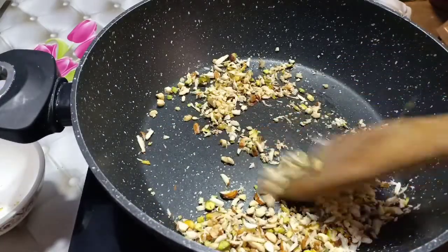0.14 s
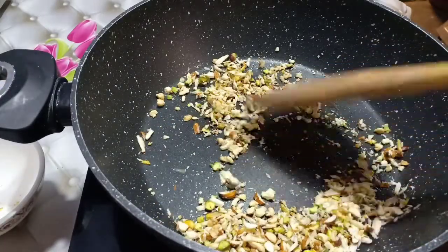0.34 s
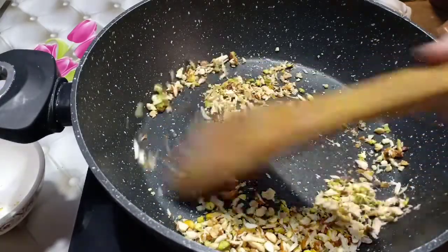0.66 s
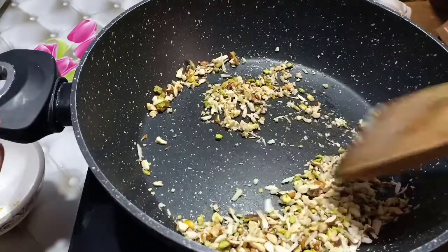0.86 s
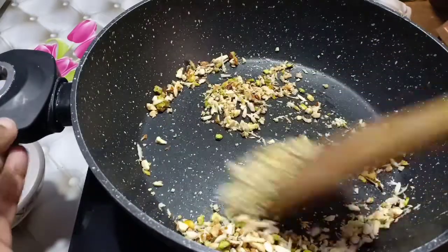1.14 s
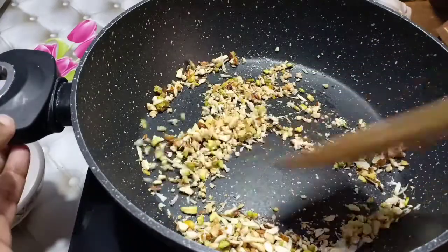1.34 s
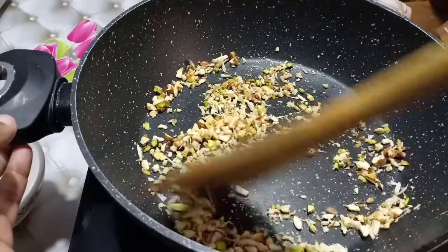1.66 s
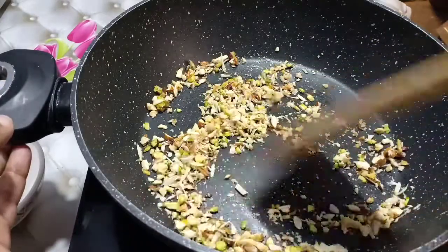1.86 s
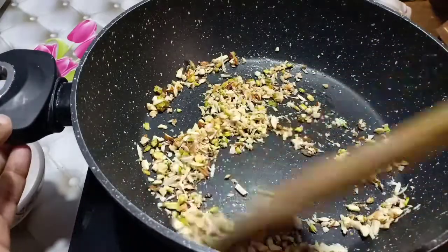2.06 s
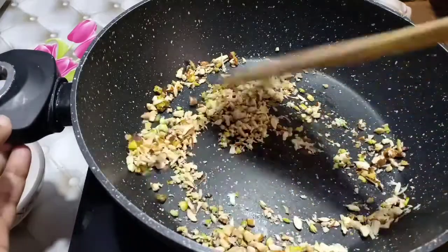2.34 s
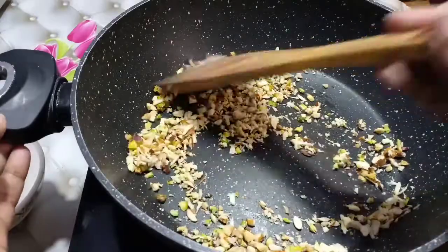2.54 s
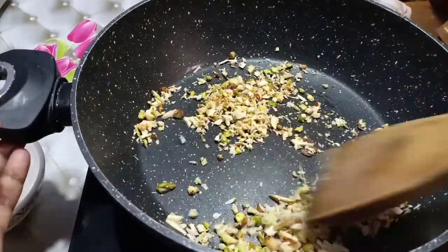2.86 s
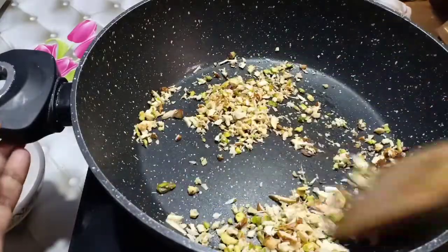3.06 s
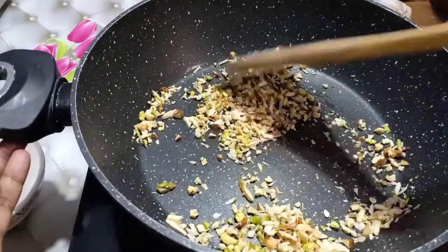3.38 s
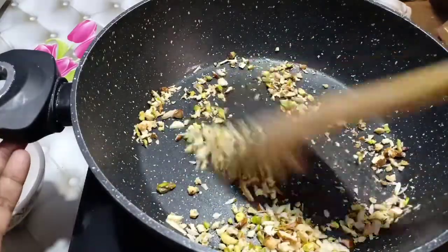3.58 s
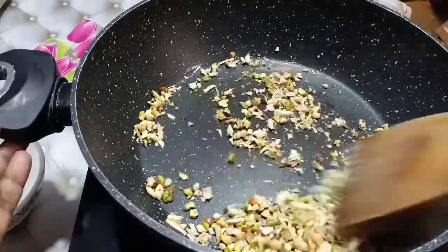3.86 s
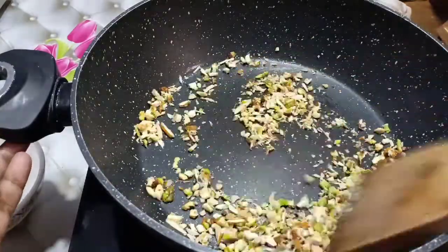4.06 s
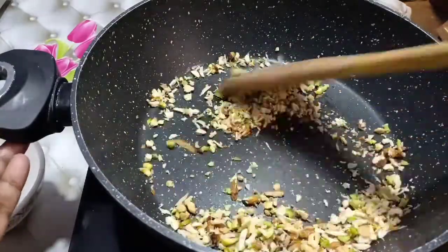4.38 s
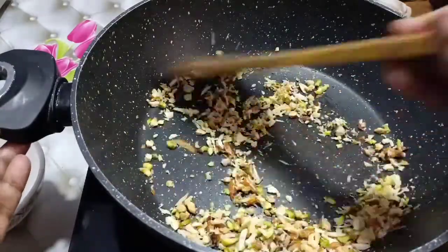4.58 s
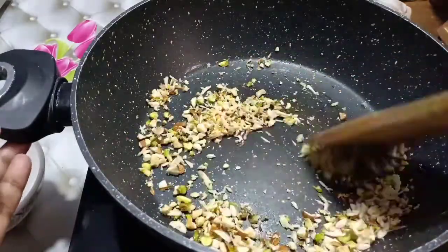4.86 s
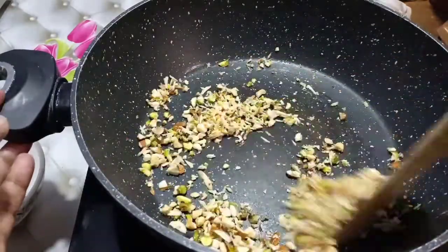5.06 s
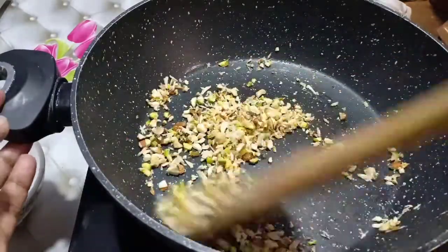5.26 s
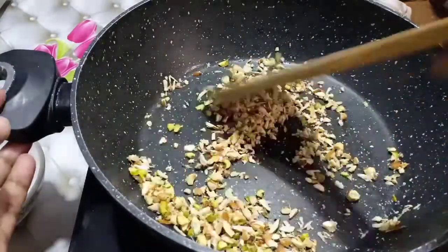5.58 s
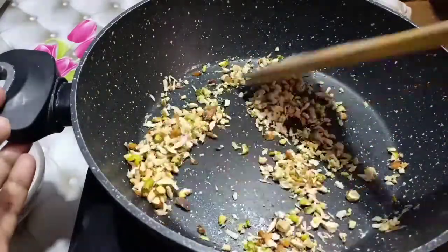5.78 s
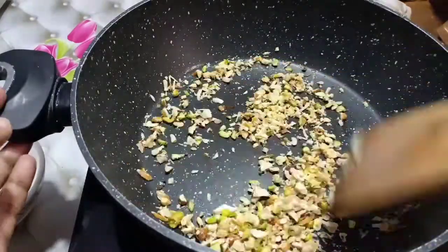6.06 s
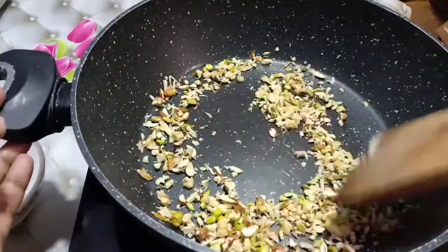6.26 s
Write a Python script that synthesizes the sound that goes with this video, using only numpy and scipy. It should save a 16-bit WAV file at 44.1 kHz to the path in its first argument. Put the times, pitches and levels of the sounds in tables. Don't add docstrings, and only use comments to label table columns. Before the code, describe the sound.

Heard from very near in stereo: uneven wood-on-pan scraping with dry nut hiss, sparse sharp knocks and dull thuds above a low airy drone, with one momentary dropout. After about four seconds the background switches suddenly to a brighter fan rush and faint high whine, while the blade edge taps rapidly, nut bits snap and drop, and grains swish around.

```python
import sys
import numpy as np
from scipy import signal
from scipy.fft import rfft, irfft
from scipy.io import wavfile
from scipy.ndimage import uniform_filter1d

SR = 44100
rng = np.random.default_rng(int(sys.argv[2]) if len(sys.argv) > 2 else 0)


def amplitude_ratio(level_db):
    exponent = np.asarray(level_db, float) / 20
    return 10 ** exponent


def put_to_file(sound):
    columns = np.atleast_2d(sound).T
    safe = np.clip(columns, -1, 1)
    whole_steps = np.round(safe * 32767)
    wavfile.write(sys.argv[1], SR, whole_steps.astype(np.int16))


N = 283563

T = np.arange(N) / SR
HZ = np.arange(N // 2 + 1) * SR / N + 1
BLOW_T = np.arange(SR // 4) / SR
SIDES = np.array([[1], [-1]])
STEADY_TOP_HZ = 15750

# freq_hz, level_db_per_hz
TICK_TONE = [(1000, -28.5), (1700, 9.5), (2400, 3.5), (3600, 3), (5000, -1.5), (5800, 5), (7000, -13.5),
             (9500, -11), (13000, -18.5), (16500, -25.5)]
# freq_hz, level_db_per_hz
SNAP_TONE = [(4000, -14), (5300, -30), (6150, 1.5), (7000, 8), (8200, -4), (9560, 9.5), (11000, -19),
             (13200, -12), (16300, -26)]
# freq_hz, level_db, t60_s
FLOOR_THUD = [(405, -0.5, 0.15), (476, 4.5, 0.086), (657, -0.5, 0.11), (973, 5, 0.03)]


def unit(x):
    return x / np.sqrt(np.mean(x ** 2))


def shape(points, peaks=(), at=HZ):
    hz, db = np.transpose(points)
    bells_db = sum(g / (1 + (2 * (at - f) / w) ** 2) for f, w, g in peaks)
    return amplitude_ratio(np.interp(np.log(at), np.log(hz), db) + bells_db)


def walk(rate_hz):
    hold = int(SR / rate_hz)
    steps = np.repeat(rng.standard_normal(N // 100 + 1), hold)[:N]
    return 1.5 * uniform_filter1d(uniform_filter1d(steps, hold), hold)


def grit(gain, per_s, spread_db, grain_s, smooth):
    caught = rng.random(N) < per_s / SR
    size = amplitude_ratio(spread_db * np.minimum(rng.exponential(size=N), 3)) * caught
    grains = signal.lfilter([1], [1, -np.exp(-1 / (grain_s * SR))], size)
    push = (unit(grains) + smooth) * rng.standard_normal((2, N))
    return unit(irfft(gain * (HZ < STEADY_TOP_HZ) * rfft(push), N))


def ring(modes, scatter_db, wide, rise_s, detune=0.012, sag=0):
    hz, db, t60 = np.transpose(modes)[:, :, None, None]
    chance = rng.standard_normal((len(modes), 4))[:, :, None]
    sag_s = 0.0045
    bent = BLOW_T + sag * sag_s * (np.exp(-BLOW_T / sag_s) - 1)
    phase = 2 * np.pi * hz * (1 + detune * chance[:, :1]) * bent
    phase = phase + chance[:, 1:2] / 4 + wide * chance[:, 2:3] * SIDES
    decay = np.exp(-np.log(1000) * BLOW_T / t60)
    y = np.sum(amplitude_ratio(db + scatter_db * chance[:, 3:]) * np.sin(phase) * decay, axis=0)
    y = y * np.sin(np.minimum(BLOW_T / rise_s, 1) * np.pi / 2) ** 2
    return y / np.max(np.abs(y))


def crack(tone, t60, wide):
    mid, side = rfft(rng.standard_normal((2, len(BLOW_T))))
    gain = shape(tone, at=np.arange(len(mid)) * 4 + 1)
    burst = irfft(gain * (mid + wide * SIDES * side), len(BLOW_T))
    fast = np.exp(-np.log(1000) * BLOW_T / t60)
    y = burst * (fast + 0.04 * fast ** 0.79) * np.minimum(BLOW_T / 0.00048, 1)
    return y / np.max(np.abs(y))


def add(out, start_s, y):
    i = int(start_s * SR)
    out[:, i:i + y.shape[1]] += y[:, :N - i]


def pressure(column, idle_db, lift_db_per_s):
    # start_s (full pressure), hold_s, ring_db, hiss_db
    strokes = [(.03, 0.082, -57, -67), (.186, 0.0072, -81, -82), (.500, 0.0059, -49.5, -59),
               (.56, 0.085, -56.5, -64), (.88, 0.041, -72, -84), (.980, 0.0073, -51, -57),
               (1.12, 0.053, -70, -89), (1.285, 0.055, -57.5, -64), (1.381, .01, -66, -57),
               (1.44, 0.13, -52, -62), (1.937, 0.1, -50, -54.5), (2.536, 0.07, -53.5, -63),
               (2.634, 0.068, -48.5, -53), (2.935, 0.0067, -64, -68), (3.073, 0.0062, -47.5, -57),
               (3.283, 0.051, -47, -53), (3.45, 0.087, -60.5, -75), (3.76, 0.014, -57, -72),
               (3.81, 0.0093, -59.5, -70), (4.14, 0.027, -59.5, -66), (4.235, .02, -48, -63)]
    press_db_per_s = 265
    total = amplitude_ratio(idle_db)
    for row in strokes:
        before_s = np.maximum(row[0] - T, 0)
        after_s = np.maximum(T - row[0] - row[1], 0)
        total = total + amplitude_ratio(row[column] - press_db_per_s * before_s - lift_db_per_s * after_s)
    return total


def scrape():
    # freq_hz, width_hz, level_db
    scrape_modes = [(1910, 280, 7), (2440, 140, 18), (3300, 260, 2.5), (3570, 690, 7.5), (4100, 240, -8),
                    (4990, 340, 9.5), (5720, 220, 10), (6200, 540, -13), (5300, 940, -7.5), (4600, 830, -3)]
    # freq_hz, level_db_per_hz
    hiss_tone = [(3000, -37.5), (6000, -8.5), (7500, -7.5), (9600, -4.5), (12000, -10), (13700, -4),
                 (15600, -11)]
    coating_top_hz, stir_db = 6440, 1.8
    push = rfft(grit(1, 700.0, 3.3, 0.002, 1.1))
    push = push / np.sqrt(1 + (HZ / coating_top_hz) ** 10)
    press = pressure(column=2, idle_db=-61, lift_db_per_s=142)
    bright = (press / amplitude_ratio(-53)) ** 0.67
    rings = 0
    for hz, width_hz, db in scrape_modes:
        stir = amplitude_ratio(db + stir_db * walk(20.67))
        mode = irfft(push / (1 + 2j * (HZ - hz) / width_hz), N)
        rings = rings + (bright if hz > 4000 else 1) * stir * mode
    hiss_press = pressure(column=3, idle_db=-84.5, lift_db_per_s=132.5)
    hiss = hiss_press * grit(shape(hiss_tone), 600.0, 2.5, 0.00077, 1.3)
    return amplitude_ratio(2.0) * press * unit(rings) + amplitude_ratio(-5.0) * hiss


def knocks():
    # start_s, body_db, rim_db, wall_db, rim_pitch_hz
    hard_knocks = [
        (1.3734, -13.5, -15.5, -8.5, 724),
        (2.9212, -10, -15, -11, 1040),
        (3.7401, -28, -31, -23, 900),
        (3.7454, -17, -22, -25.5, 1010),
    ]
    # start_s, wall_db, tick_db
    nicks = [(0.073, -40, -41.5), (.179, -39, -52), (0.412, -42, -43.5), (0.476, -51, -41),
             (.606, -35, -50), (0.9, -47, -45), (0.968, -41, -36.5), (1.3654, -34, -39),
             (1.895, -38, -39.5), (2.513, -30, -39), (3.032, -37, -42), (3.397, -29.5, -36.5)]
    # start_s, body_db, body_pitch_hz, rim_db
    dull_thuds = [
        (1.913, -24.5, 456, -34.5),
        (2.562, -15, 548, -31),
        (3.441, -28.5, 460, -57),
        (4.0889, -14.5, 534, -39),
        (4.1168, -25, 475, -42),
    ]
    # pitch_ratio, level_db, t60_s
    body_modes = [(.33, -10, 0.049), (.57, -9.5, 0.049), (.78, -13, 0.033), (1.0, 3, 0.07), (.97, -10, .25),
                  (1.2, -15.5, 0.037)]
    # pitch_ratio, level_db, t60_s
    flat_modes = [(.3, -18, .05), (.5, -3, .035), (.72, -5, .015), (1.0, 2.5, .05), (1.3, -4, .015),
                  (1.7, -9.5, 0.041), (2.2, -13.5, .025)]
    # freq_hz, level_db, t60_s
    rim_modes = [(721, 13.5, 0.062), (677, -13.5, 0.083), (757, -14.5, 0.027), (884, -22.5, 0.08),
                 (900, -12, 0.023), (1012, 12.5, 0.054), (1049, 1, 0.087), (1140, -1, .03)]
    # freq_hz, level_db, t60_s
    wall_modes = [(1940, -25, 0.0078), (2160, -12, 0.013), (2410, 13, 0.0084), (2400, -13, 0.08),
                  (2465, -11.5, 0.15), (2880, -4.5, 0.01), (3020, -10.5, 0.021), (4090, -18.5, 0.047),
                  (4810, -10, 0.026), (5850, -12.5, 0.018)]
    # start_s, freq_hz, level_db, t60_s
    spot_modes = [(1.3735, 4090, -18, 0.03), (1.3732, 1042, -15.5, 0.032), (1.3735, 6200, -34, 0.012),
                  (1.392, 4100, -35, .05), (1.3656, 6000, -28, .015), (1.3656, 3350, -37.5, .015),
                  (1.3732, 687, -23, 0.069), (1.3735, 3040, -24.5, .012), (2.9215, 5700, -25, 0.026),
                  (2.9215, 5100, -28, 0.021), (2.925, 1600, -24, .04), (2.9262, 1190, -25, 0.034),
                  (2.9282, 433, -18.5, 0.053), (2.929, 753, -18, 0.086), (2.9351, 433, -19, 0.037),
                  (2.945, 1900, -33, 0.043), (3.398, 1900, -29, .015), (3.7454, 2020, -26, 0.033),
                  (3.7454, 745, -29, 0.062)]
    floor_hz, tick_below_wall_db, thud_wall_db = 433, -8, -50
    blows = [(s, body, rim, wall, wall + tick_below_wall_db, hz, floor_hz)
             for s, body, rim, wall, hz in hard_knocks]
    blows += [(s, -38, -48, wall, tick, 800, floor_hz) for s, wall, tick in nicks]
    blows += [(s, body, rim, thud_wall_db, thud_wall_db + tick_below_wall_db, 900, hz)
              for s, body, hz, rim in dull_thuds]
    out = np.zeros((2, N))
    for s, body_db, rim_db, wall_db, tick_db, rim_hz, body_hz in sorted(blows):
        rim = [(hz, db - 16 * abs(np.log2(hz / rim_hz)), t60) for hz, db, t60 in rim_modes]
        free = np.clip(3.5 + (wall_db + 7.5), 0.22, 1)
        if body_hz != floor_hz:
            body = ring(np.multiply(flat_modes, (body_hz, 1, 1)), 0.94, 0.11, 0.0016, 0.003, 0.33)
        else:
            body = ring(np.multiply(body_modes, (body_hz, 1, np.sqrt(free))), 0.94, 0.11, 0.0015, 0.003)
        blow = amplitude_ratio(body_db - 2.0) * body
        blow = blow + amplitude_ratio(rim_db + 3.5) * ring(rim, 0.77, 0.6, 0.0029, 0.003)
        wall = np.multiply(wall_modes, (1, 1, free))
        blow = blow + amplitude_ratio(wall_db + 5.0) * ring(wall, 0.88, 1.3, 0.0012, 0.0037)
        blow = blow + amplitude_ratio(tick_db + 8.5 - 3.5 * free) * crack(TICK_TONE, 0.032, 0.98)
        add(out, s, blow)
    for s, hz, db, t60 in spot_modes:
        add(out, s, amplitude_ratio(db) * ring([(hz, 0, t60)], 0, 0.52, 0.00088, 0.001))
    return out


def blade_ticks():
    # start_s, level_db
    clicks = [(0.186, -39), (0.1916, -44), (0.508, -37), (.5417, -55), (0.582, -42.5), (0.871, -46),
              (1.119, -44), (1.2748, -40.5), (1.5324, -47), (1.959, -38), (1.992, -42), (2.629, -35.5),
              (3.048, -37), (3.242, -55), (3.2765, -47), (3.2986, -44), (3.483, -41), (3.7902, -42),
              (3.8066, -41), (3.935, -44)]
    out = np.zeros((2, N))
    for s, db in clicks:
        add(out, s, amplitude_ratio(db + 6.5) * crack(TICK_TONE, 0.024, 0.905))
    return out


def grate_thumps():
    # start_s, level_db
    thumps = [
        (1.917, -42.5),
        (2.567, -56),
        (3.409, -41),
        (4.121, -53),
    ]
    # freq_hz, level_db, t60_s
    grate_modes = [(90, -2, 0.11), (125, 12.5, 0.38), (148, -11, 0.062)]
    out = np.zeros((2, N))
    for s, db in thumps:
        add(out, s, amplitude_ratio(db) * ring(grate_modes, 2, 0.2, 0.015))
    return out


def edge_taps():
    # start_s, wood_db, wood_pitch_hz, clack_db, tick_db
    taps = [(4.42, -15, 1740, -37, -45), (4.4963, -14, 1716, -20.5, -22), (4.5938, -16, 1870, -33, -47),
            (4.7171, -19, 1710, -30, -29), (4.8, -15, 1750, -42, -31), (4.9959, -12.5, 1940, -33, -55),
            (5.0295, -15.5, 1620, -26.5, -39), (5.1251, -15.5, 1720, -21, -24),
            (5.2565, -23.5, 1870, -60, -54), (5.934, -21, 1700, -32.5, -40), (6.118, -24.5, 1680, -33, -54),
            (6.4214, -14, 1630, -23.5, -37.5)]
    # start_s, wood_db, wood_pitch_hz, clack_db,
    # tick_db
    wall_taps_and_ticks = [(4.2847, -45, 1580, -57, -45), (4.291, -48, 1650, -57, -43), (4.394, -27.5, 1360, -57, -51),
                           (4.8954, -30.5, 1610, -54, -52), (5.3855, -24, 1740, -30, -40),
                           (5.438, -26.5, 1540, -31, -37), (5.443, -24, 1530, -35, -42),
                           (5.4714, -16.5, 1690, -34, -52), (5.5594, -17, 1684, -20, -16.5),
                           (5.5657, -20, 1650, -42, -35), (5.5799, -14.5, 1480, -37, -48)]
    # start_s, wood_db, wood_pitch_hz, thud_db
    bumps = [
        (5.682, -14, 1620, -31),
        (5.8058, -48, 1480, -25.5),
        (6.229, -37, 1490, -27),
        (6.258, -43, 1490, -35),
        (6.303, -29, 1490, -34.5),
    ]
    # freq_hz, level_db, t60_s
    wood_modes = [(472, -16.5, 0.01), (673, -15.5, 0.015), (960, -11, 0.02), (1285, -11, 0.01),
                  (1490, -3, 0.01), (1997, -2.5, 0.0097), (2400, -8, 0.0036), (2570, -13.5, 0.013)]
    # pitch_ratio, level_db, t60_s
    blade_modes = [(1.0, 0, .010), (1.0, -22, .03)]
    # freq_hz, level_db, t60_s
    clack_modes = [(2780, -1.5, 0.02), (3060, 1, 0.021), (3360, -7, .01), (3556, 1, 0.015), (4010, 0, .014),
                   (4164, -3, 0.012), (4580, -9, 0.012)]
    # freq_hz, level_db, t60_s
    snap_modes = [(5360, -15, 0.0057), (6210, -7.5, 0.007), (6900, -15, 0.0046), (8530, -2.5, 0.006),
                  (9500, 3.5, 0.0057), (10100, -6, 0.0052), (11600, -11, 0.0037), (13200, -10, .005),
                  (14800, -12, .004)]
    # start_s, freq_hz, level_db, t60_s
    tap_modes = [(4.421, 1370, -30, 0.013), (4.4963, 3970, -23.5, 0.016), (4.5934, 1490, -24, 0.016),
                 (4.593, 1240, -26, 0.014), (4.799, 1230, -29, .012), (4.8, 2030, -28, 0.011),
                 (4.9954, 960, -29, 0.02), (4.9956, 650, -26, .015), (4.9953, 1540, -23, .012),
                 (5.0302, 2070, -19, 0.011), (5.1252, 1940, -24, 0.011), (5.132, 990, -32, 0.034),
                 (5.388, 1680, -21, 0.029), (5.44, 3050, -36, 0.014), (5.5584, 3540, -20, 0.014),
                 (5.587, 1486, -26, 0.044), (5.686, 502, -31.5, 0.06), (5.933, 2750, -26.5, 0.027),
                 (5.9337, 2000, -30, .015), (6.118, 2820, -32, .02), (6.128, 2830, -33, .02),
                 (6.233, 1490, -30, 0.054), (5.5591, 6200, -16.5, 0.01), (5.565, 9700, -28, .015)]
    blows = [(s, db, hz, db - 16.5, clack, tick) for s, db, hz, clack, tick in taps]
    blows += [(s, db, hz, db - 23, clack, tick) for s, db, hz, clack, tick in wall_taps_and_ticks]
    blows += [(s, db, hz, thud, db - 24, db - 30) for s, db, hz, thud in bumps]
    out = np.zeros((2, N))
    for s, wood_db, hz, thud_db, clack_db, tick_db in sorted(blows):
        extra = 2.1 * min(amplitude_ratio(clack_db - wood_db), 0.4)
        floor = np.add(wood_modes, (0, -10 * extra, 0))
        blade = np.multiply(blade_modes, (hz, 1, 1 + extra))
        blade = blade + [(0, 0, 0), (0, 4 * extra, 0)]
        blow = amplitude_ratio(wood_db + 1.0) * ring(np.vstack([floor, blade]), 2.2, 0.11, 0.00061)
        blow = blow + amplitude_ratio(clack_db + 8.0) * ring(clack_modes, 0.9, 0.63, 0.0006, 0.01)
        snap = ring(snap_modes, 1.2, 0.75, 0.00027, 0.011) + 0.41 * crack(SNAP_TONE, 0.01, 0.7)
        blow = blow + amplitude_ratio(tick_db + 12.0) * snap
        blow = blow + amplitude_ratio(thud_db - 1.0) * ring(FLOOR_THUD, 0.95, 0.076, 0.0012)
        add(out, s, blow)
    for s, hz, db, t60 in tap_modes:
        add(out, s, amplitude_ratio(db) * ring([(hz, 0, t60)], 0, 0.22, 0.00062, 0.001))
    return out


def drops_and_nudges():
    # start_s, level_db
    drops = [(4.4404, -37), (5.072, -41), (5.138, -34), (5.3086, -33), (5.8338, -39), (5.8393, -31),
             (6.0408, -36), (6.229, -34)]
    # start_s, level_db
    nudges = [(4.916, -46), (4.954, -47), (5.058, -32.5), (5.353, -56), (5.421, -48), (5.992, -38),
              (6.024, -36), (6.064, -39), (6.124, -36), (6.331, -33.5)]
    out = np.zeros((2, N))
    for s, db in drops:
        add(out, s, amplitude_ratio(db + 4) * crack(SNAP_TONE, 0.008, 0.7))
    for s, db in nudges:
        add(out, s, amplitude_ratio(db - 1) * ring(FLOOR_THUD, 1.5, 0.081, 0.0012, 0.051))
    return out


def rustle():
    # centre_s, level_db, length_s
    tosses = [(4.29, -41.5, 0.02), (4.34, -57, 0.041), (4.45, -42.5, 0.031), (4.51, -50, 0.064),
              (4.60, -65, .04), (4.65, -46.5, 0.058), (4.72, -60, 0.045), (4.83, -43.5, 0.024),
              (4.89, -61, .09), (4.955, -41, 0.073), (5.05, -40.5, 0.07), (5.095, -45, 0.034),
              (5.14, -48, 0.044), (5.26, -52, 0.044), (5.30, -46, 0.029), (5.40, -55, .04),
              (5.47, -45, 0.03), (5.575, -47, 0.086), (5.70, -46, 0.049), (5.84, -43, 0.037),
              (5.94, -45, 0.03), (6.0, -52, .06), (6.05, -46.5, 0.02), (6.135, -47, 0.029),
              (6.255, -40, 0.035), (6.34, -46.5, 0.033)]
    # time_s, level_db
    bed = [(4.25, -52.5), (4.8, -52.5), (5.28, -51.5), (5.36, -66), (6.43, -71)]
    # freq_hz, level_db_per_hz
    rustle_tone = [(3000, -21.5), (5500, -15.5), (8000, -10.5), (9700, -6), (11000, -10.5), (13000, -15),
                   (15600, -12)]
    swell = amplitude_ratio(np.interp(T, *np.transpose(bed)))
    for s, db, length_s in tosses:
        swell = swell + amplitude_ratio(db) * np.cos(np.clip((T - s) / (1.6 * length_s), -0.5, 0.5) * np.pi) ** 2
    return swell * grit(shape(rustle_tone), 1000.0, 6.9, 0.0014, 1.2)


def kitchen(x, t60, wet_db, gain, low_hz):
    echo_shares = [
        (1, .71, .46, .29, .17, .097),
        (.93, .77, .41, .33, .19, .083),
    ]
    echo_gain = 0.6
    longest_s = t60 * np.log(1 / echo_gain) / np.log(1000)
    lag = np.exp(-2j * np.pi * HZ * longest_s * np.array(echo_shares)[:, :, None])
    mid, side = np.prod((lag - echo_gain) / (1 - echo_gain * lag), axis=1) * lag[:, -1]
    spread = mid + np.minimum(HZ / 1000, 1) * SIDES * side
    x = x + amplitude_ratio(wet_db) * irfft(rfft(x.mean(axis=0), N) * gain * spread / np.sqrt(2), N)
    return signal.sosfilt(signal.butter(4, low_hz, "high", fs=SR, output="sos"), x)


def air(gain, alike, swell_db, flicker_db, rate_hz):
    hz, likeness = np.transpose(alike)
    c = np.clip(np.interp(np.log(HZ), np.log(hz), likeness), 0, 1)
    mid, side = rfft(rng.standard_normal((2, N)))
    both = gain * (HZ < STEADY_TOP_HZ) * (np.sqrt(1 + c) * mid + SIDES * np.sqrt(1 - c) * side)
    swell, out = swell_db * walk(rate_hz), 0
    for octave in range(5, 15):
        band = np.cos(np.clip(np.log2(HZ) - octave, -1, 1) * np.pi / 2) ** 2
        out = out + amplitude_ratio(swell + flicker_db * walk(rate_hz * 4)) * irfft(both * band, N)
    return unit(out)


def extractor_drone():
    # freq_hz, level_db_per_hz
    drone_tone = [(15, -72), (25, -31), (137, -4), (217, -6), (270, -9.5), (301, -12.5), (394, 4.5),
                  (607, -11.5), (734, -8.5), (988, -13.5), (1610, -15.5), (2690, -15.5), (3620, -32),
                  (4490, -26), (16000, -64)]
    # freq_hz, width_hz, level_db
    drone_peaks = [(118, 54, 0.5), (278.3, 25, 13.5), (332, 56, 4.5), (415, 38, -4.5), (712, 46, 5),
                   (961, 270, 9), (2414, 140, -2)]
    # freq_hz, left_right_likeness (0-1)
    drone_alike = [(40, 0.7), (80, .88), (130, 1), (290, 0.84), (640, 0.73), (1410, 0), (3100, 0.04)]
    return amplitude_ratio(-38.5 - 0.92 * SIDES) * air(shape(drone_tone, drone_peaks), drone_alike, 0.25, 1.0, 3.3)


def cooktop_fan():
    # freq_hz, level_db_per_hz
    fan_tone = [(25, -18), (40, -31), (70, -24), (105, -45), (150, -18.5), (250, -14), (400, -7),
                (860, -3.5), (1190, -5.5), (1480, -1.5), (2910, -4.5), (5430, -14.5), (9840, -14.5),
                (15700, -28)]
    # freq_hz, width_hz, level_db
    fan_peaks = [(374, 31, 3.5), (478, 2.5, 8), (1080, 86, 0.5), (1490, 220, 6.5), (1922, 36, 7.5),
                 (2430, 185, -13), (3840, 720, 5), (6240, 360, 0)]
    # freq_hz, left_right_likeness (0-1)
    fan_alike = [(60, 0.6), (130, 0.66), (290, 0.82), (640, 0.95), (1410, 0.78), (3100, 0.48), (6820, 0),
                 (15000, 0)]
    return amplitude_ratio(-39) * air(shape(fan_tone, fan_peaks), fan_alike, 0.1, 1.17, 3.2)


def whine():
    # freq_hz, level_db
    whine_tones = [(1098, -53), (9620, -70), (10664, -73), (11063, -73), (14616, -79)]
    # time_s, level_db
    ninth_fade = [(4.25, -60), (4.6, -55), (5.25, -58), (5.4, -76), (6.43, -87)]
    tones = 0
    for hz, db in whine_tones:
        tones = tones + amplitude_ratio(db + 4.5) * np.sin(2 * np.pi * hz * T + 2.45 * walk(6.9))
    ninth_db = np.interp(T, *np.transpose(ninth_fade)) + 3.5 * walk(25)
    return tones + amplitude_ratio(ninth_db) * np.sin(2 * np.pi * 9877 * T + 1.2 * walk(15))


def first_shot():
    colour = shape([(200, 4.0), (1000, -8.5), (3000, -6.5), (12000, -3.0)])
    blows = kitchen(knocks() + blade_ticks(), 0.2, -5.5, colour, 100.0)
    return scrape() + grate_thumps() + amplitude_ratio(-0.7 * SIDES) * blows + extractor_drone()


def second_shot():
    colour = shape([(300, 2.0), (1500, 3.0), (4000, 4.0), (12000, -8)])
    blows = kitchen(edge_taps() + drops_and_nudges(), 0.055, -11.5, colour, 394.0)
    return (blows + rustle() + cooktop_fan() + whine()) * amplitude_ratio(-0.95 * SIDES)


def scene():
    change_s = 4.253
    fade = np.clip((T - change_s) / 0.004 + 0.5, 0, 1)
    return (1 - fade) * first_shot() + fade * second_shot()


def low_pass(x):
    return signal.sosfilt(signal.butter(12, 16560, fs=SR, output="sos"), x)


def record(dry):
    limit, mute_from_s, mute_to_s = 0.95, 2.2935, 2.4305
    hiss = irfft(rfft(rng.standard_normal((2, N))) * (HZ < STEADY_TOP_HZ), N)
    mix = limit * np.tanh((dry + amplitude_ratio(-69.5) * hiss) / limit)
    mix = signal.sosfilt(signal.ellip(12, 0.2, 70, 16250, fs=SR, output="sos"), mix)
    unmuted = np.clip(np.maximum(mute_from_s - T, T - mute_to_s) / 0.00056, 0, 1)
    return low_pass((mix + 0.0011) * unmuted)


dry = scene()
out = record(dry)
put_to_file(out)
```